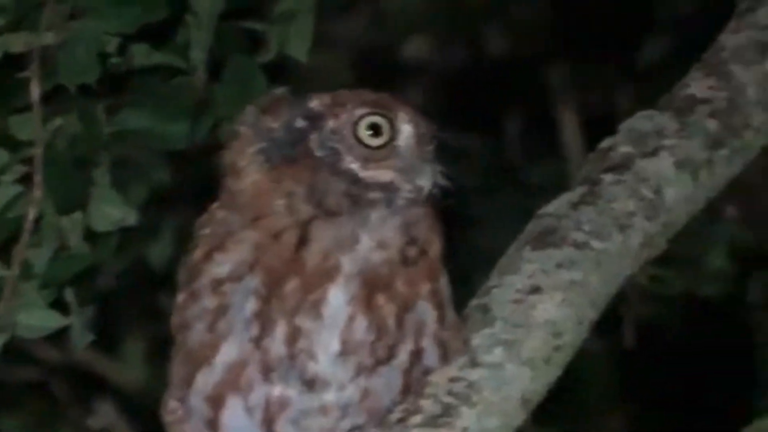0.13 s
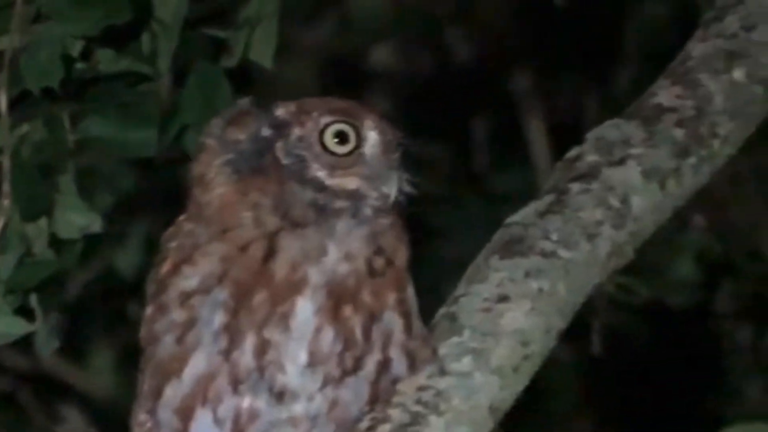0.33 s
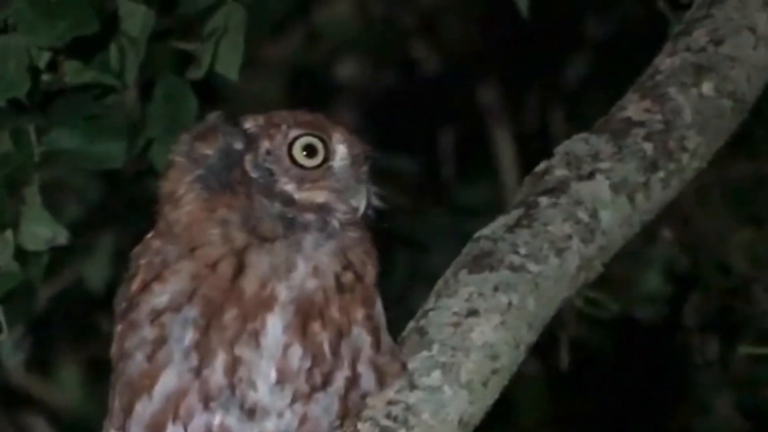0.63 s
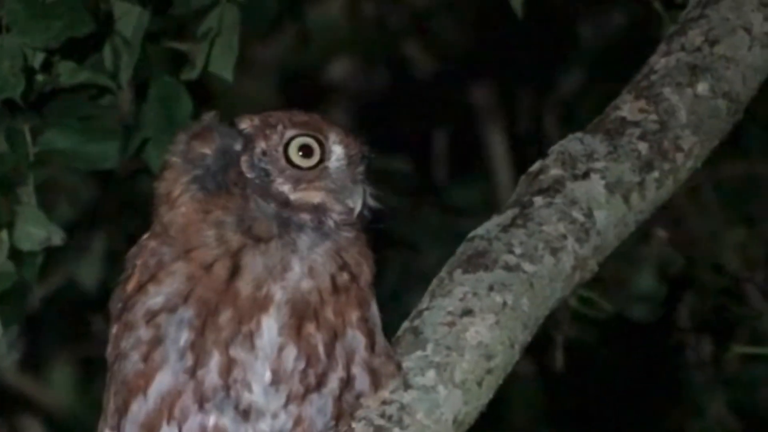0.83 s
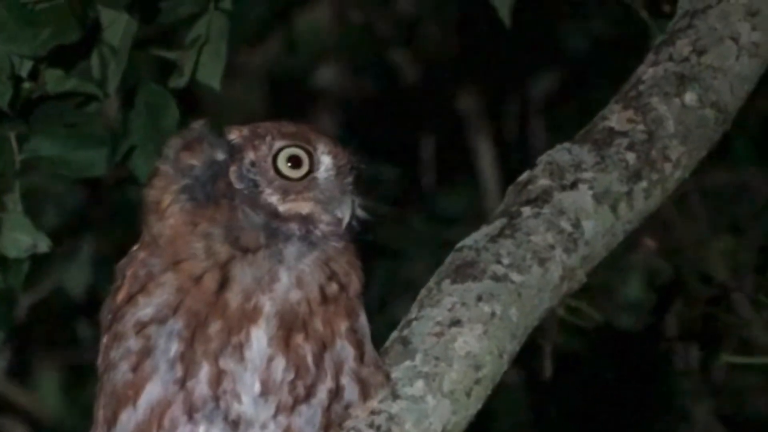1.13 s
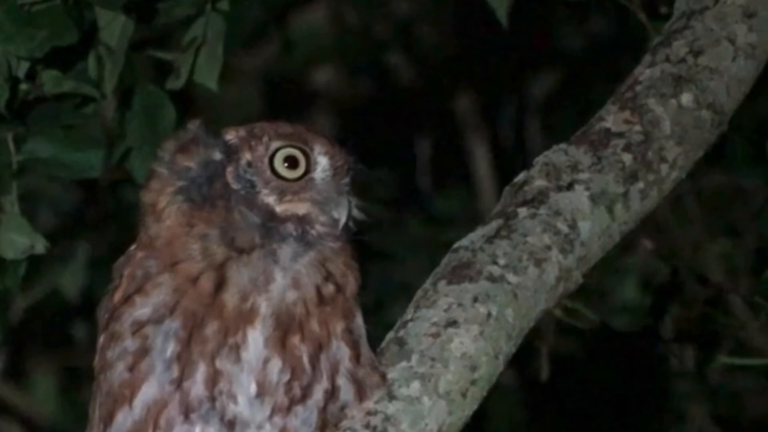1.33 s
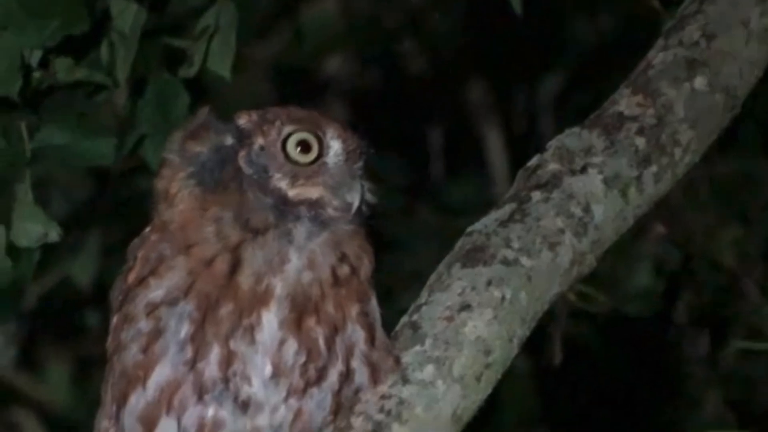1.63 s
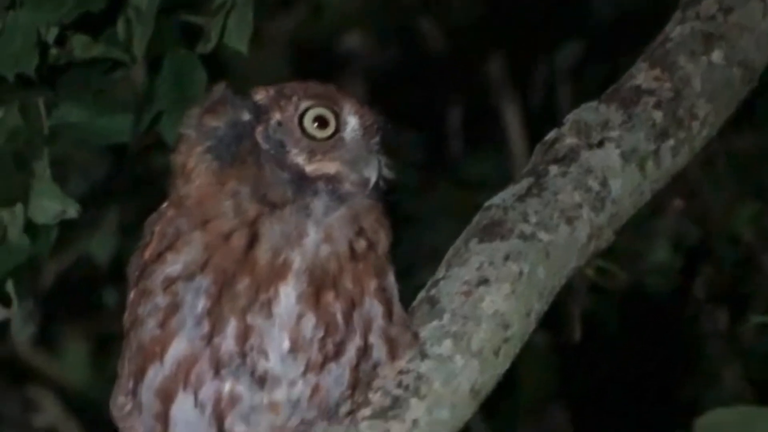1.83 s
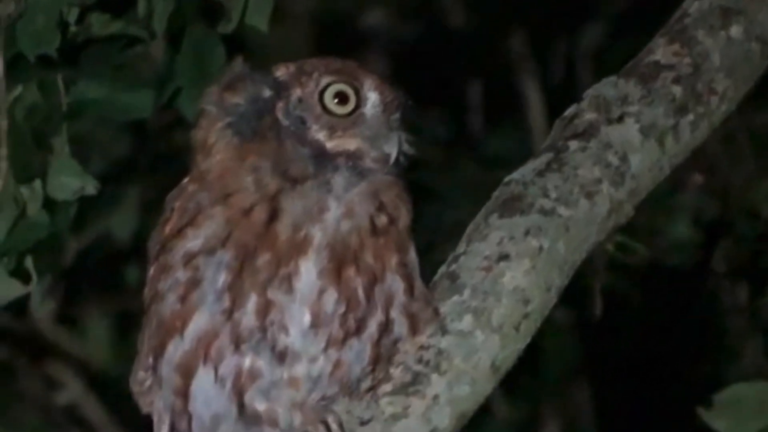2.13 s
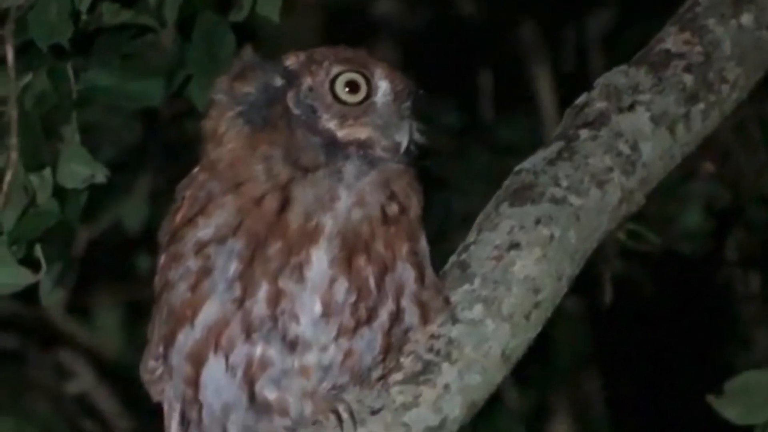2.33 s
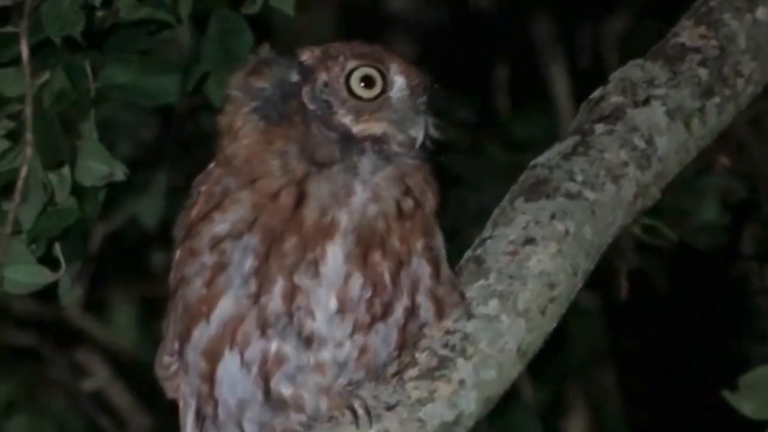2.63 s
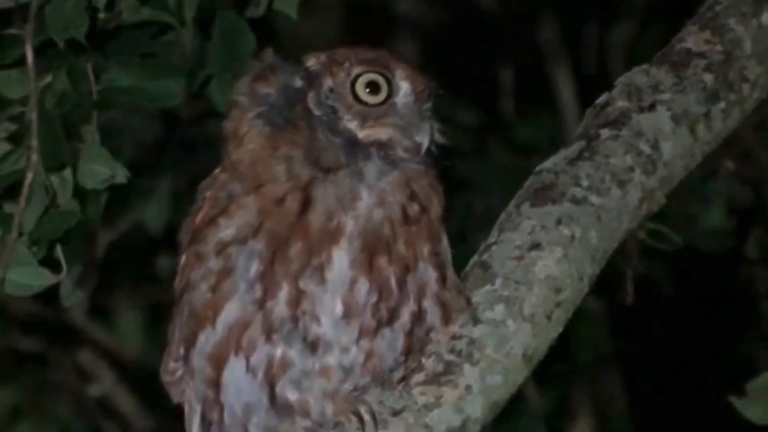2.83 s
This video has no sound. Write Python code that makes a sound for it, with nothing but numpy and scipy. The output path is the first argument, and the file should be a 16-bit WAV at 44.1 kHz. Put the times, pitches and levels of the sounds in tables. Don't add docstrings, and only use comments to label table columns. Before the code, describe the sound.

A dense, bright chorus of crickets and katydids fills a night wood throughout; a small owl gives one soft, quavering, falling whinny at the start, then handling ticks and one hard knock on a hand-held camera microphone.

```python
import sys
import numpy as np
from scipy import signal
from scipy.fft import rfft, irfft
from scipy.io import wavfile
from scipy.ndimage import map_coordinates

SR = 44100
rng = np.random.default_rng(int(sys.argv[2]) if len(sys.argv) > 2 else 0)


def pcm_store(signal):
    levels = np.round(np.clip(np.atleast_2d(signal), -1, 1) * 32767)
    wavfile.write(sys.argv[1], SR, levels.astype(np.int16).T)


def how_loud(loudness_db):
    steps = np.asarray(loudness_db, float) / 20
    return 10 ** steps


N = 132300
TIME = np.arange(N) / SR
HZ = np.maximum(np.arange(N // 2 + 1) * SR / N, 1)


def rms_one(x):
    return x / np.sqrt(np.mean(x ** 2) + 1e-20)


def in_time(rows):
    s, *columns = np.transpose(rows)
    return [np.interp(TIME, s, c) for c in columns]


def at_hz(points):
    hz, value = np.transpose(points)
    return np.interp(np.log(HZ), np.log(hz), value)


def drift(rate):
    knots = rng.standard_normal(400)
    return map_coordinates(knots, [TIME[::50] * rate + 3], order=3).repeat(50)


def resonate(x, hz, width_hz):
    radius = np.exp(-np.pi * width_hz / SR)
    poles = [1, -2 * radius * np.cos(2 * np.pi * hz / SR), radius * radius]
    once = signal.lfilter([1, 0, -1], poles, x + 1e-18)
    return signal.lfilter([1, 0, -1], poles, once)


def pan(x, db):
    return x * how_loud(np.array([[db / 2], [-db / 2]]))


def lead(x, rad):
    z = signal.hilbert(x)
    return np.real([z * np.exp(.5j * rad), z * np.exp(-.5j * rad)])


def mid_side(mid, side):
    return mid + side * [[1], [-1]]


def air():
    # (frequency [Hz], density [dB per Hz])
    air_spectrum = [(25, -3.65), (70, 2.3), (160, -4.5), (340, -9.5), (800, -7.5), (1100, -22.5),
                    (4000, -19.5), (6300, -47.5)]
    # (frequency [Hz], left-right likeness [0 to 1])
    likeness = [(60, 1), (150, 0.97), (380, 0.33), (950, 0.43), (2380, 0.3), (5980, 0.33), (15000, 0.9)]
    # (frequency [Hz], width [Hz], level [dB], left leads [rad])
    drones = [
        (121.9, 9.2, -58.5, .1),
        (131.8, 3, -65, 0.16),
        (467.6, 7.3, -64, 1.6),
    ]
    air_db, hiss_db = -50, -69.5
    alike = np.clip(at_hz(likeness), 0, 1)
    mid, side = rfft(rng.standard_normal((2, N))) * how_loud(at_hz(air_spectrum))
    out = rms_one(irfft(mid_side(np.sqrt(1 + alike) * mid, np.sqrt(1 - alike) * side), N)) * how_loud(air_db)
    for hz, width_hz, db, rad in drones:
        hum = resonate(rng.standard_normal(N + SR), hz, width_hz)[SR:]
        out += lead(rms_one(hum), rad) * how_loud(db)
    high = signal.butter(4, 8000, "high", fs=SR, output="sos")
    return out + how_loud(hiss_db) * signal.sosfilt(high, rng.standard_normal((2, N)))


def wind():
    # (time [s], level [dB])
    gusts = [(0.0, -38.5), (0.1, -62), (0.83, -58), (0.88, -79), (1.0, -51), (1.66, -56), (1.8, -45.5),
             (2.06, -50.5), (2.14, -40), (2.16, -59), (2.51, -41.5), (3.0, -59.5)]
    top_hz, side_db = 81, -13
    band = signal.butter(2, [18, top_hz], "band", fs=SR, output="sos")
    mid, side = signal.sosfilt(band, rng.standard_normal((2, N + SR)))[:, SR:]
    return rms_one(mid_side(mid, how_loud(side_db) * side)) * how_loud(in_time(gusts)[0] - 1.5)


def trill(per_s, jitter, smear_s):
    beats = np.cumsum(per_s * (1 + jitter * drift(6))) / SR + rng.random()
    strokes = np.diff(np.floor(beats), prepend=np.floor(beats[0]) - 1)
    puffs = signal.lfilter([1], [1, -np.exp(-1 / SR / smear_s)], strokes)
    return puffs * rng.standard_normal(N)


def chorus(count=9):
    # (carrier [Hz], spread of carriers [Hz], fall at the edge [dB],
    # resonance width [Hz], level [dB])
    singers = [
        (2185, 120, 5, 77, -59.5),
        (2615, 190, 5.5, 100, -49),
        (4460, 254, 13.5, 270, -45),
        (4730, 123, -3.5, 98, -40),
        (5530, 445, 16, 136, -33),
        (6343, 9.8, 34, 59, -63.5),
        (9160, 1850, 12.5, 350, -59),
        (11420, 1000, 3, 330, -57),
        (13360, 640, -16, 750, -54),
        (14460, 1220, 9, 430, -51),
    ]
    # (pulse rate [1/s], left-right difference [dB], spread of difference [dB], swell [dB])
    singer_places = [(60, 0, 3.5, 1), (55, 0, 3.5, 1), (50, 1.5, 3, 1.5), (45, 1.5, 3, 2.2),
                     (70, 1.4, 1.5, .5), (60, 1.5, 1.5, 1), (150, -.3, 4, .6), (150, .1, 12, .6),
                     (170, 3.4, 1.5, 2.5), (190, 3.4, 1.5, 1.8)]
    # (time [s], level [dB])
    katydid_swell = [
        (0.0, -43),
        (0.02, -53),
        (0.42, -55),
        (1.05, -50),
        (2.98, -54),
        (3.0, -51),
    ]
    scatter_s = .02
    out, swell_db = 0, in_time(katydid_swell)[0]
    swell_db = swell_db - swell_db.mean()
    for singer, place in zip(singers, singer_places):
        hz, spread_hz, fall_db, width_hz, db = singer
        per_s, pan_db, wide_db, sway_db = place
        kind = 0
        for off in np.linspace(-1, 1, count):
            pulses = trill(per_s * rng.uniform(.8, 1.2), .15, scatter_s)
            song = rms_one(resonate(pulses, hz + spread_hz * off, width_hz))
            song = song * how_loud(sway_db * drift(7.21) - fall_db * abs(off))
            kind = kind + pan(song, pan_db + wide_db * rng.choice([-1, 1]))
        out = out + rms_one(kind) * how_loud(db + (hz > 12000) * swell_db)
    return out


def tree_cricket():
    hz, width_hz, strokes_per_s, jitter = 2967, 80, 47, .004
    level_db, blur_gain = -57.5, 1.89
    beats = np.cumsum(strokes_per_s * (1 + jitter * drift(5))) / SR
    strokes = np.diff(np.floor(beats), prepend=0)
    song = resonate(strokes, hz - 50, width_hz) - resonate(strokes, hz + 50, width_hz)
    blur = resonate(rng.standard_normal(N), hz - 50, width_hz)
    blur = blur + resonate(rng.standard_normal(N), hz + 50, width_hz)
    both_parts = rms_one(song) + blur_gain * rms_one(blur)
    return pan(both_parts * how_loud(level_db + 0.83 * drift(5.3)), 0.53)


def owl():
    # (time [s], mean pitch [Hz], level [dB], wobble [Hz], throb [dB])
    whinny = [
        (.02, 900, -62, 0.1, 0.1),
        (.08, 1015, -46, 0.1, .1),
        (.16, 1008, -44, 8, .3),
        (.40, 1014, -43, 42, 1.5),
        (.70, 970, -49, 45, 8.5),
        (.885, 895, -67, 30, 5),
        (.925, 875, -55, 16, 1),
        (1.15, 790, -55.5, 34, 1),
        (1.4, 690, -65, 40, 2),
    ]
    wobble_per_s, tired_per_s, wobble_top_s, tires_s = 13.6, 11.8, .441, .88
    pan_db, echo_db, echo_s, rough = 1.2, -12, .15, .08
    hz, db, wobble_hz, throb_db = in_time(whinny)
    tired = TIME > tires_s
    turns = wobble_per_s * (TIME - wobble_top_s)
    turns = turns - (wobble_per_s - tired_per_s) * np.maximum(TIME - tires_s, 0)
    beat = np.cos(2 * np.pi * turns) + .22 * np.cos(4 * np.pi * turns)
    pitch_hz = hz + wobble_hz * beat + (5 + 14 * tired) * drift(35)
    voice = np.sin(2 * np.pi * np.cumsum(pitch_hz) / SR)
    voice *= np.sqrt(2) * how_loud(db + throb_db * np.cos(2 * np.pi * turns - .3))
    voice *= 1 + rough * (1 + 3.6 * tired) * drift(39.98)
    voice *= (TIME > whinny[0][0]) & (TIME < whinny[-1][0])
    tail = rng.standard_normal((2, 20000)) * np.exp(-np.arange(20000) / SR / echo_s)
    tail /= np.sqrt(np.sum(tail ** 2, axis=1, keepdims=True))
    echo = signal.fftconvolve(voice[None], tail, axes=1)[:, :N]
    return pan(voice, pan_db) + how_loud(echo_db) * echo


def near_cricket():
    # (start [s], length [s], level [dB])
    chirps = [
        (.157, .177, -52.5),
        (.554, .197, -52.5),
        (.953, .195, -57),
        (1.338, .13, -57),
        (1.697, .171, -57),
        (2.102, .25, -56),
        (2.47, .12, -56.5),
        (2.603, .169, -53),
        (2.916, .08, -56),
    ]
    chirp_hz, rise_hz, syllable_s, gap_s, gain_db = 11160, 150, .0053, .0345, 4
    out, t = np.zeros(N + SR), np.arange(-600, 600) / SR
    bell = np.exp(-.5 * (t / syllable_s) ** 2)
    for start_s, length_s, db in chirps:
        chance = rng.standard_normal((12, 3))
        for k, at in enumerate(np.arange(start_s + 0.0051, start_s + length_s, gap_s)):
            i = int((at + .002 * chance[k, 0]) * SR)
            hz = chirp_hz + 90 * chance[k, 1]
            tone = np.sin(2 * np.pi * (hz * t + rise_hz * t ** 2 / syllable_s / 4))
            tone += 0.23 * np.sin(2 * np.pi * (hz - 250) * t) * chance[k, 0]
            flutter = 1 + .5 * np.sin(t * 1500 + 3 * chance[k, 0])
            out[i - 600:i + 600] += how_loud(db + gain_db + 0.91 * chance[k, 2]) * tone * flutter * bell
    return pan(out[:N], -.5)


def knocks():
    # (time [s], level [dB], low modes [dB], high modes [dB], left-right difference [dB])
    ticks = [
        (1.2136, -36, 4, -5, -1.5),
        (1.3523, -38, -14, 4, 1),
        (1.5434, -50, 8, 16, -6),
        (2.257, -42, 3.5, -17, -5),
        (2.6845, -23.5, 3, 2.9, -3),
        (2.971, -46, -1, 6, -2.5),
    ]
    # (frequency [Hz], level [dB], 60 dB decay [s], left leads [rad])
    low_modes = [(475, -4, .13, 1.5), (740, -2, .018, .9), (826, -15, .35, .6), (400, -10, .025, 1.2)]
    mid_modes = [(877, 0, 0.022, 0.55), (1283, -11.5, 0.073, -1.7), (1503, -2, 0.014, -0.24),
                 (1810, -5, .025, -1.5)]
    high_modes = [(2150, -2, .012, -.4), (2900, -1, .008, .2), (3600, -7, .005, .1), (8300, -9, .002, .5),
                  (11000, -10, .0012, .5)]
    rise_s, fall_s = .0012, .0022
    hard_db, soft_loss = -26, .35
    out, t = np.zeros((2, N + SR)), np.arange(-300, 12000) / SR
    shape = np.exp(np.where(t < 0, t / rise_s, -t / fall_s))
    for s, db, low_db, high_db, pan_db in ticks:
        i = int(s * SR) - 300
        for modes, part_db in ((low_modes, low_db), (mid_modes, 0), (high_modes, high_db)):
            for hz, mode_db, t60, rad in modes:
                radius, angle = how_loud(-60 / (t60 * SR)), 2 * np.pi * hz / SR
                poles = [1, -2 * radius * np.cos(angle), radius * radius]
                ring = signal.lfilter([1], poles, shape * rng.standard_normal(len(t)))
                loss_db = (t60 > .1 or hz > 6000) * soft_loss * min(db - hard_db, 0)
                gain = how_loud(db + part_db + mode_db + loss_db)
                out[:, i:i + len(t)] += pan(lead(ring / abs(ring).max(), rad), pan_db) * gain
    return out[:, :N]


def scene():
    return air() + wind() + chorus() + tree_cricket() + owl() + near_cricket() + knocks()


def band_limit(x):
    return signal.sosfilt(signal.butter(12, 15790, fs=SR, output="sos"), x)


def record(dry):
    return band_limit(dry)


dry = scene()
out = record(dry)
pcm_store(out)
```